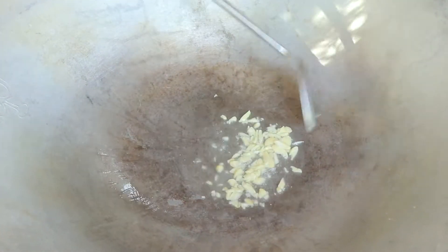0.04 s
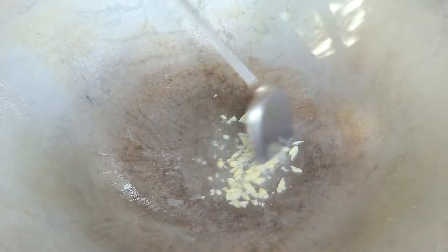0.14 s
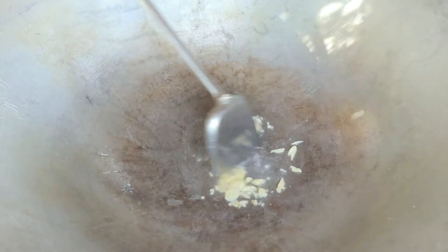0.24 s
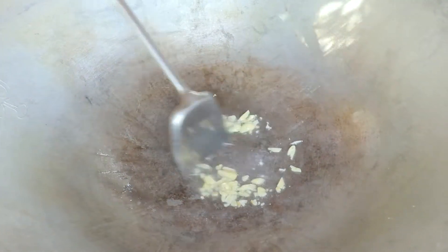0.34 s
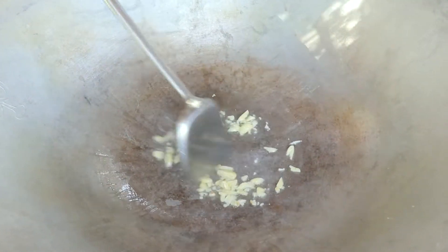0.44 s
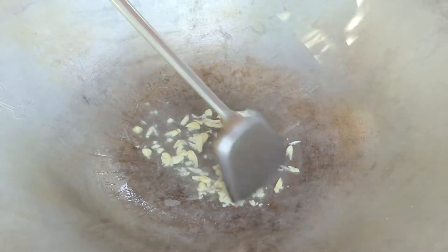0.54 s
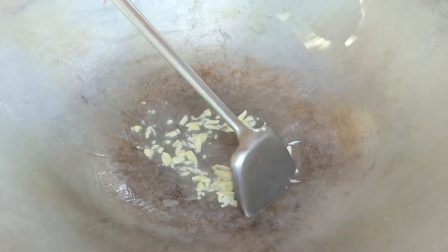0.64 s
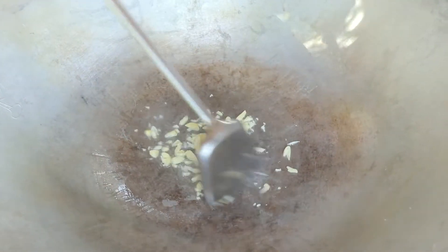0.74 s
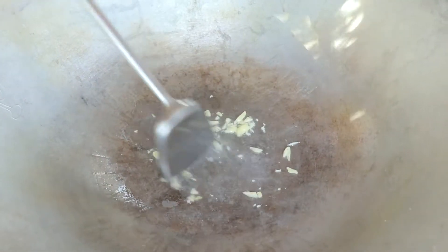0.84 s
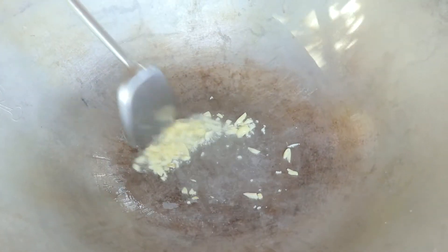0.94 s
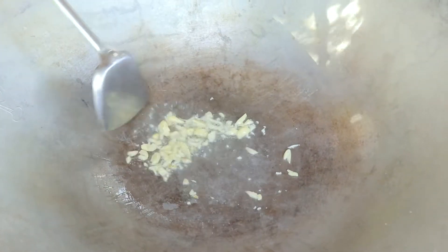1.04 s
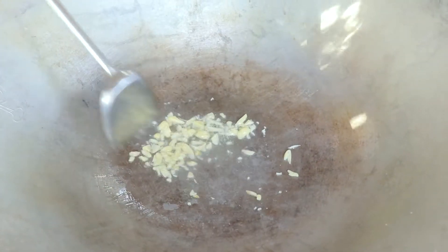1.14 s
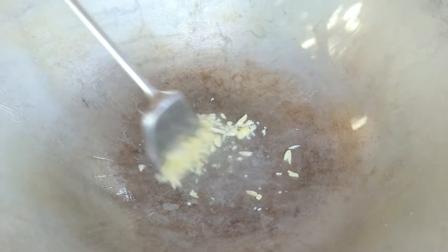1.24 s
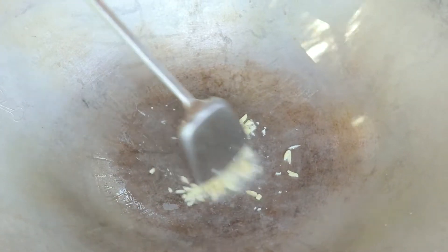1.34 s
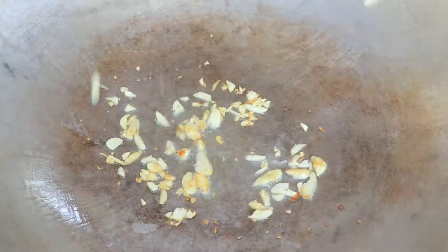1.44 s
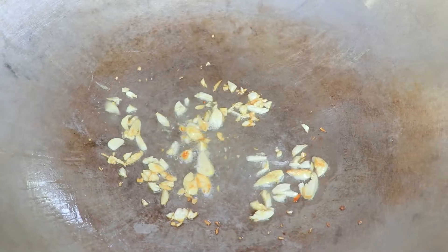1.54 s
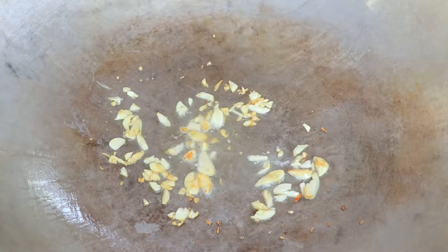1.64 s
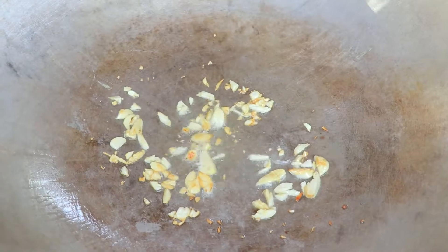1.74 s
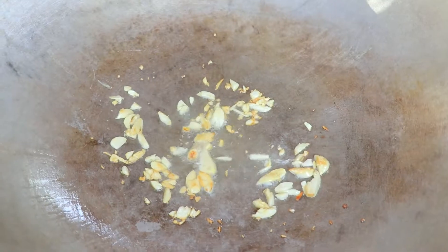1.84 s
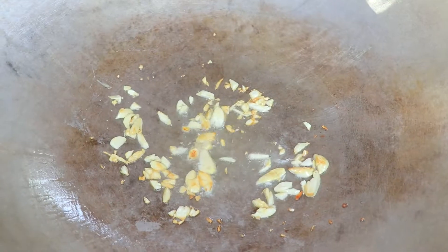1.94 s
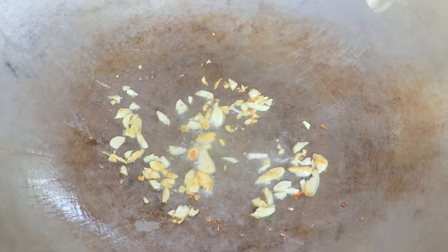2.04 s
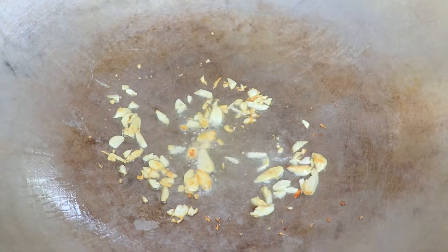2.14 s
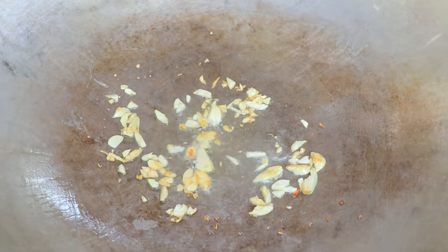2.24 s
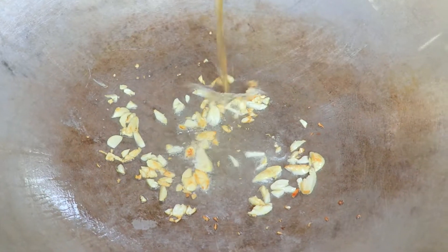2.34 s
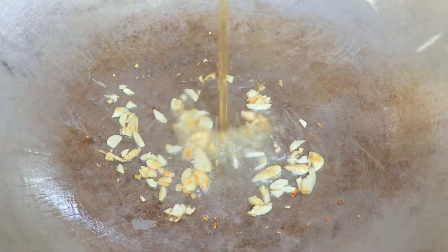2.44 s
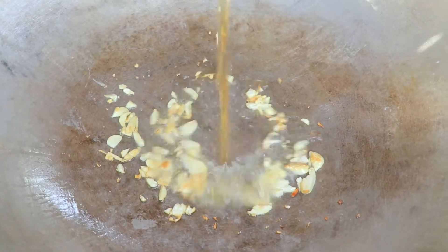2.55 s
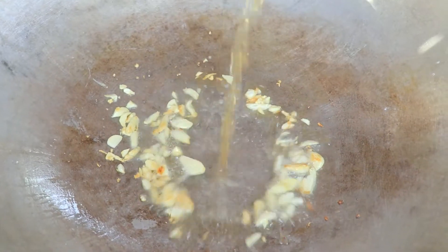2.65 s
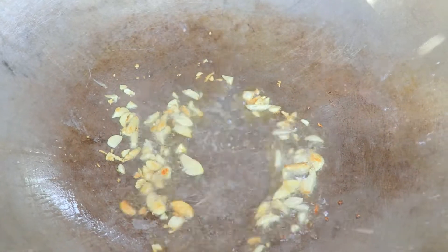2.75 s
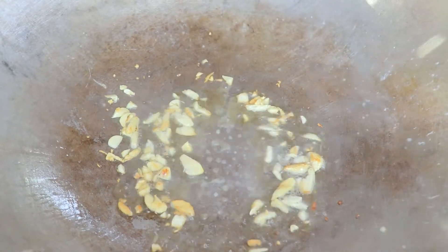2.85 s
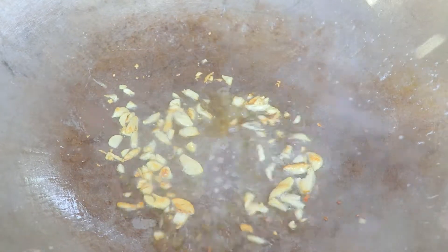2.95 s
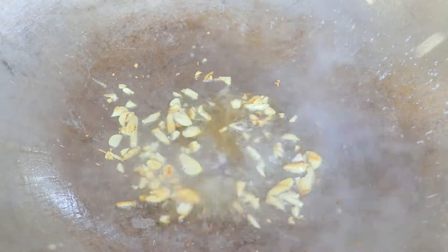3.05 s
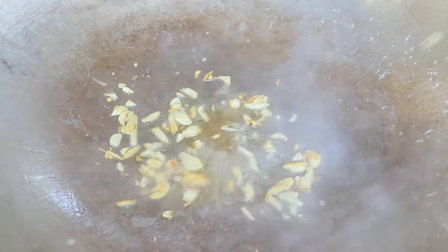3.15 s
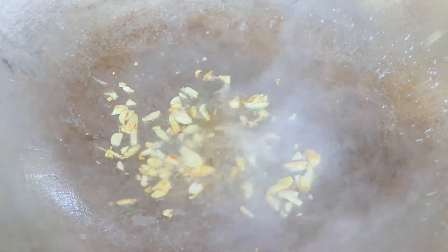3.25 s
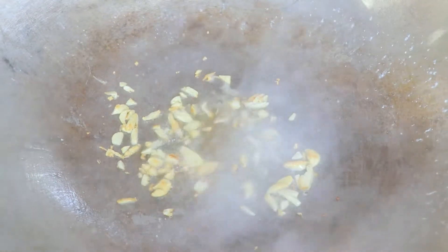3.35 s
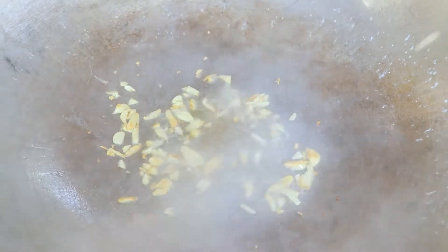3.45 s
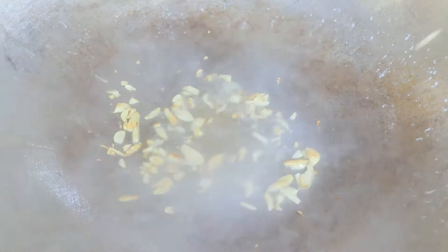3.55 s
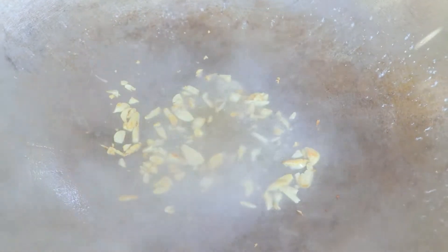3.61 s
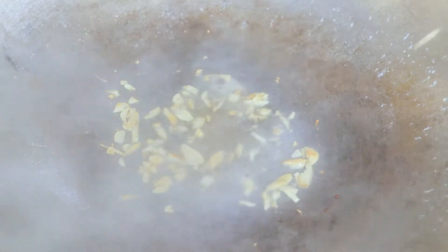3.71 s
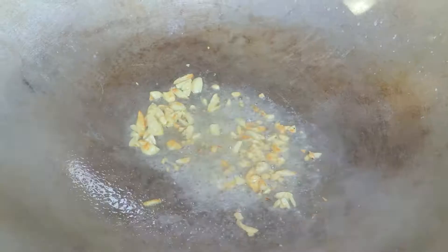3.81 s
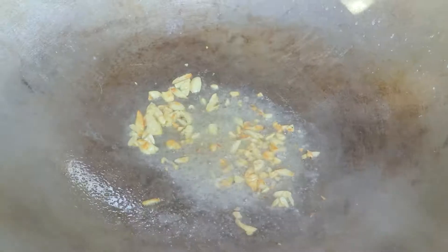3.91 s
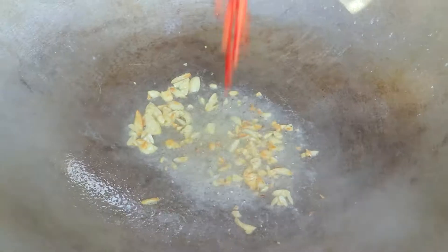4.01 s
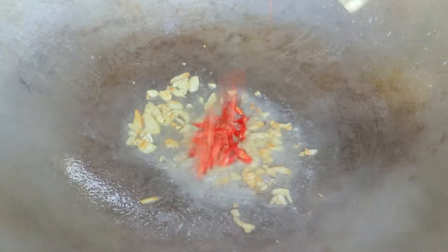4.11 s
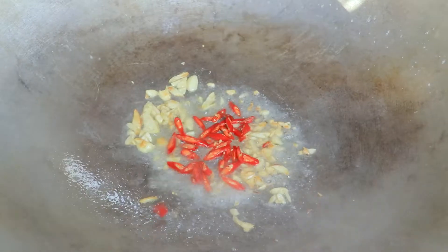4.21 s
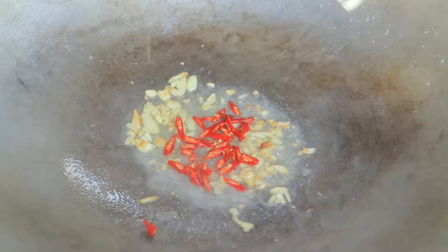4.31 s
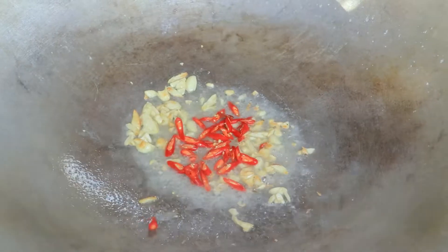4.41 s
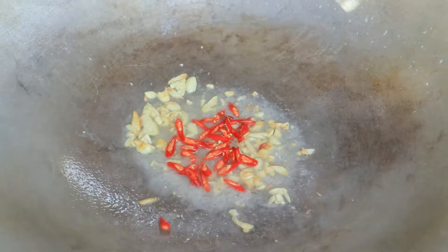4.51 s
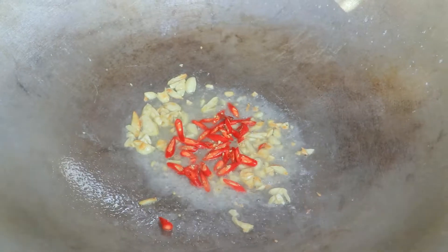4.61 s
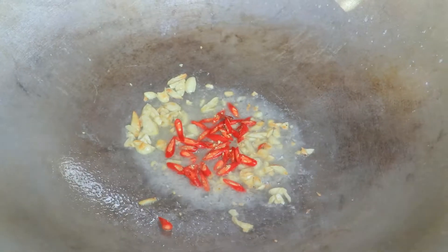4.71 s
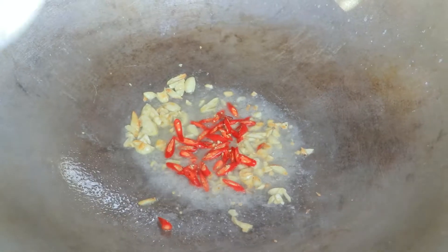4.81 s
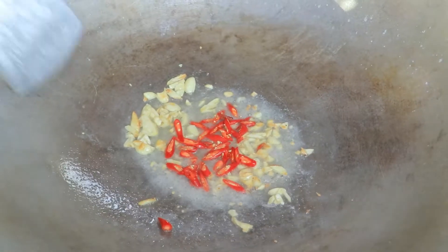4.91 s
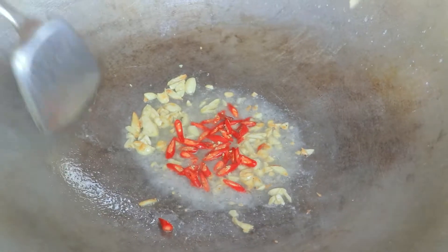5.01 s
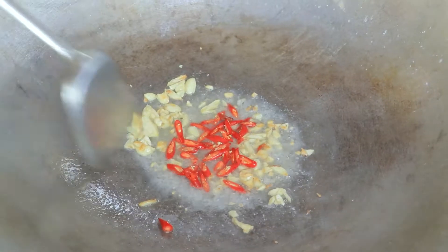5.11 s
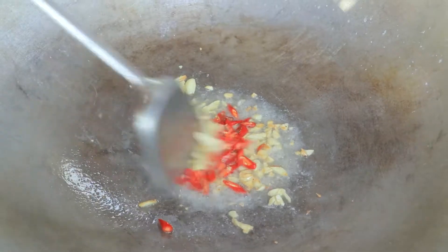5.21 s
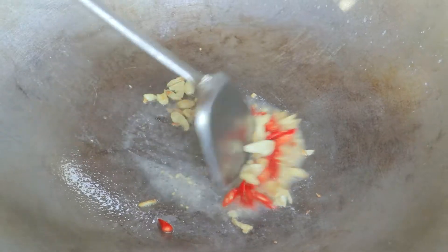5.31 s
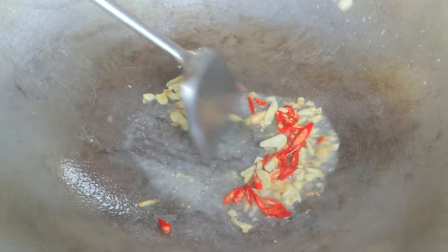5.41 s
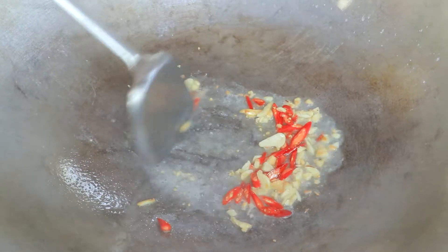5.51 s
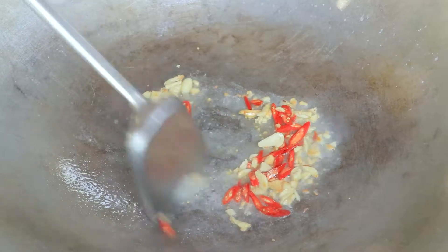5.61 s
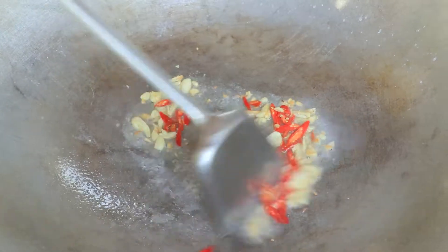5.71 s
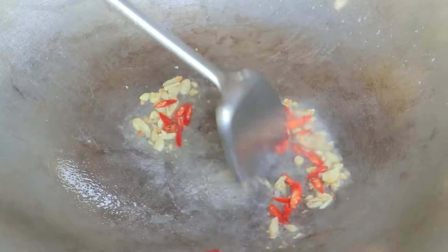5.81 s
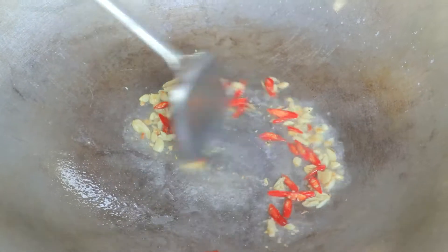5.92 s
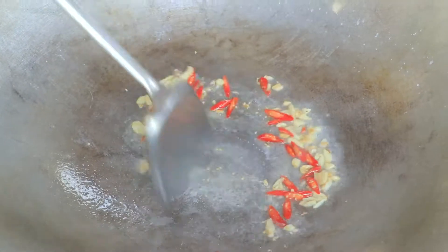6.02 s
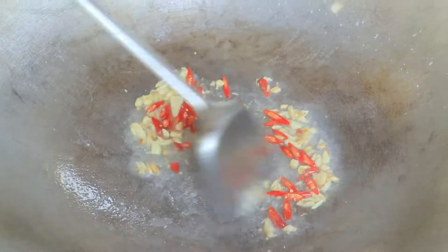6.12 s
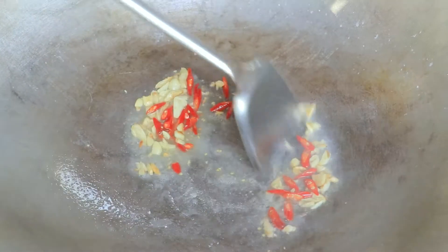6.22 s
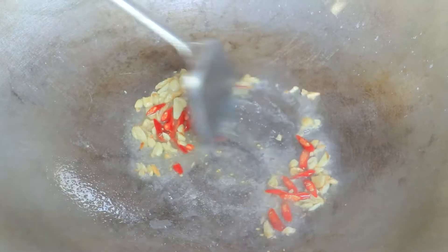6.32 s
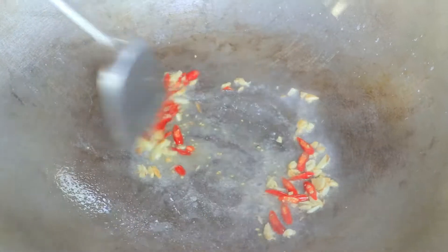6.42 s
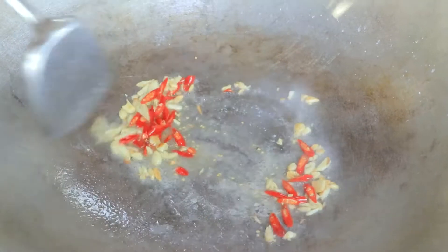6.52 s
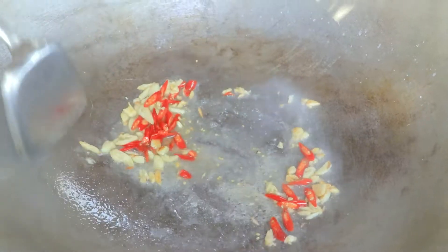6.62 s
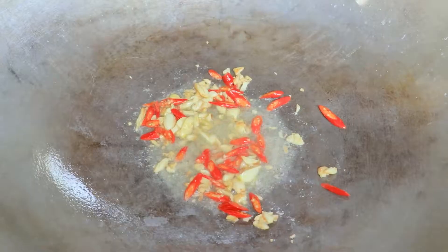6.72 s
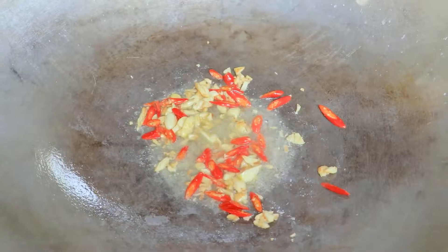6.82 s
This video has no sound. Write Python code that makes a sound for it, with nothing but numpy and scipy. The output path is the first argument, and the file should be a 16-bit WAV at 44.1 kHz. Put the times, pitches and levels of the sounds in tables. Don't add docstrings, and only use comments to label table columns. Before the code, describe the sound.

A close microphone hears a steel wok almost only in the left channel; the right is faint hiss. From 0 to 1.45 s oil sizzles and spits while a metal spatula scrapes in quick, gritty, ringing pushes, with hard clanks near 0.66-0.8 and 1.17 s, some overloading, and a short blade ring. An abrupt cut leaves quiet, thin oil with separate dry ticks and pops. Around 2.4 s poured sauce starts to boil, surging within half a second to a dense, loud, bubbling roar held until 3.86 s. A cut drops it to a steady, softer simmer; chilies land softly at 4.16 s. At 5.12 s a rattling cluster of blows strikes the rim, then from 5.47 to 6.39 s the blade scrapes, snags and squeals, brightest near 6.15 s. Simmer continues to a tiny silence at 6.68 s, then a last rising sizzle. Faint low air and pan hum lie underneath.

```python
import sys
import numpy as np
from scipy import signal
from scipy.fft import rfft, irfft, next_fast_len
from scipy.io import wavfile
from scipy.ndimage import uniform_filter1d, map_coordinates

SR = 44100
rng = np.random.default_rng(int(sys.argv[2]) if len(sys.argv) > 2 else 0)


def int16_out(signal):
    q = np.round(np.clip(np.atleast_2d(signal).T, -1, 1) * 32767)
    wavfile.write(sys.argv[1], SR, q.astype(np.int16))


def level_to_linear(level):
    exponent = np.asarray(level, float) / 20
    return 10 ** exponent


N = 302526
T = np.arange(N) / SR
HZ = np.fft.rfftfreq(next_fast_len(N + SR), 1 / SR)

# (start [s], large bubbles [dB], drift [dB/s], small over large [dB], crackle over hiss [dB])
TAKES = [
    (0, -38, -3.5, -3, 1.5),
    (1.459, -57, -2.5, -5.5, 3),
    (3.862, -40.5, -0.45, 0.4, -18),
    (5.122, -41, 1.5, -1, -12),
    (6.68, -47, 7, 0.5, -11),
]
# (pitch [Hz], width [Hz], level [dB])
PAN = [(128.5, 17, -16.5), (165, 30, -17), (253, 180, -6), (319, 73, -14), (429, 70, -16), (474, 72, -11),
       (621, 28, -11), (786, 70, -18), (1071, 18, -8), (1250, 47, -4), (1365, 150, 1.5), (1600, 115, -0.5),
       (1780, 65, -2), (1930, 17, -8), (2020, 11.6, -6.5), (2130, 90, -2.5), (2340, 91, -1),
       (2550, 72, -2.5), (2784, 21, -4.5), (3100, 73, -6), (3110, 20, -11), (3330, 52, -7.5),
       (4680, 200, -13)]
TAKE = np.searchsorted([row[0] for row in TAKES], T, "right") - 1
BEFORE_CHILIES = T < TAKES[2][0]


def unit(x):
    return x / np.sqrt(np.mean(x ** 2) + 1e-20)


def along(points, hz):
    f, v = np.transpose(points)
    return np.interp(np.log(hz + 1), np.log(f + 1), v)


def wobble(rate, step=1):
    coarse = T[::16]
    knots = rng.standard_normal(int(N * rate / SR) + 4)
    return np.interp(T[::step], coarse, map_coordinates(knots, [coarse * rate]))


def filtered(x, response):
    m = 2 * len(HZ) - 2
    return irfft(rfft(x, m) * response, m)[:N]


def narrow_noise(hz, width):
    return unit(filtered(rng.standard_normal(N), 1 / (1 + (2 * (HZ - hz) / width) ** 2)))


def bursts(s, size, hz, cycles, length=256):
    turn = np.outer(hz, np.arange(length) / SR)
    life = 2 * turn / np.maximum(cycles, .2)[:, None]
    wave = size[:, None] * np.sin(2 * np.pi * turn) * life * np.exp(1 - life)
    at = np.round(s * SR).astype(int)[:, None] + np.arange(length)
    return np.bincount(at.ravel(), wave.ravel(), N + SR)[:N]


def space(x, wet_db):
    # (pitch [Hz], time to fall 60 dB [s])
    echo_time = [(500, 0.072), (3000, 0.079), (12000, 0.069)]
    out = np.pad(x, (0, SR))
    quarter = SR // 4
    for a in range(0, N, quarter):
        piece = x[a:a + quarter]
        if not piece.any():
            continue
        hz, t, z = signal.stft(rng.standard_normal(SR // 5), SR, nperseg=128)
        fade = level_to_linear(-60 * t / along(echo_time, hz)[:, None])
        tail = signal.istft(z * fade, SR, nperseg=128)[1]
        wet = signal.fftconvolve(piece, tail / np.linalg.norm(tail))
        out[a + 40:][:len(wet)] += level_to_linear(wet_db) * wet
    return out[:N]


def boil_share(lead_s=0):
    # (time [s], share of full boil)
    heating = [
        (2.37, 0.033),
        (2.44, 0.21),
        (2.52, 0.62),
        (2.68, 0.83),
        (2.86, 0.96),
        (3.0, 1.034),
        (3.3, 1.04),
        (3.87, 1.067),
    ]
    return np.interp(T + lead_s, *np.transpose(heating))


def simmer():
    start, large, drift, small, crackle = np.array(TAKES)[TAKE].T
    large = large + drift * (T - start)
    middle = large - 3.5 + 0.82 * small
    full_db = 31.5
    small_boil, middle_boil, large_boil = (boil_share(lead_s) * BEFORE_CHILIES for lead_s in (0.049, 0.02, 0))
    drowned_db = -11 * np.minimum(3 * large_boil, 1)
    return (large + small + full_db * small_boil, middle + full_db * middle_boil,
            large + full_db * large_boil, crackle + drowned_db)


def crowd(count, low_hz, spread_db, cycles, wet_db):
    d = rng.random((count, 3))
    size = level_to_linear(-spread_db * np.log(np.maximum(d[:, 1], .04)))
    pitch = low_hz * (14000 / low_hz) ** d[:, 2]
    x = space(bursts(d[:, 0] * N / SR, size, pitch, np.full(count, cycles), length=128), wet_db)
    tilt = np.sqrt(uniform_filter1d(abs(rfft(x, 2 * len(HZ) - 2)) ** 2, size=3000))
    return unit(filtered(x, 1 / np.maximum(tilt, .05 * tilt.max())))


def frying():
    # (low [Hz], high [Hz])
    bubble_ranges = [(6500, 15000), (3800, 6000), (600, 3300)]
    # (pitch [Hz], level [dB per Hz])
    bowl_colour = [(90, -32), (260, -20), (500, -16), (1000, -9), (1800, -6), (2250, -3), (3050, -4),
                   (3550, -7.5), (5100, -2.5), (5900, -7.5), (6600, -9), (9600, -10), (10800, -15),
                   (15700, -15.5)]
    *levels, crackle_db = simmer()
    bubbles = crowd(count=20000, low_hz=518, spread_db=0.5, cycles=2.05, wet_db=-0.5)
    crackle = crowd(count=1500, low_hz=1500, spread_db=3.5, cycles=.8, wet_db=-3) / np.sqrt(2)
    steam = rng.standard_normal(N)
    raw = 0.5 * bubbles + 0.84 * steam + level_to_linear(crackle_db) * crackle
    upper, lower = (1 / (1 + (c / (HZ + 1)) ** 8) for c in (6300, 3600))
    parts = upper, lower * (1 - upper), 1 - lower
    colour = level_to_linear(along(bowl_colour, HZ))
    surge = 0.36 * wobble(2.8) + 0.5 * wobble(14)
    out = 0
    for db, part, (lo, hi) in zip(levels, parts, bubble_ranges):
        own = colour * np.sqrt(part)
        inside = np.sqrt(np.sum(own[(HZ > lo) & (HZ < hi)] ** 2) / len(HZ))
        out = out + level_to_linear(db - 3.0 + surge + 0.16 * wobble(15)) * filtered(raw, own / inside)
    return out


def yard():
    # (pitch [Hz], level [dB per Hz])
    air_colour = [(12, -28.5), (20, -2), (87, -3), (135, -5.5), (205, -9), (399, -25), (499, -19),
                  (900, -44.5), (1170, -33.5), (1980, -120)]
    noise = unit(filtered(rng.standard_normal(N), level_to_linear(along(air_colour, HZ))))
    return level_to_linear(-70.5 + 0.82 * wobble(5.3)) * noise


def humming():
    hum_levels = [-61.5, -80, -78.5, -73, -72]
    return level_to_linear(np.array(hum_levels)[TAKE] + 0.99 * wobble(4.73)) * narrow_noise(127, 12)


def snagging():
    # (time [s], peak [dB], pitch [Hz])
    plucks = [(.014, -22, 2640), (.112, -17.5, 2590), (.159, -24, 3000), (.232, -18.5, 2440),
              (.256, -23, 1670), (.262, -16.5, 2000), (.276, -13.5, 2770), (.392, -21, 2320),
              (.821, -29, 2480), (.831, -25, 1790), (.922, -18.5, 3150), (1.2355, -22, 1620),
              (1.358, -25, 2440), (1.365, -23, 3000), (1.238, -24, 3100), (1.272, -26, 2900),
              (5.474, -20, 2340), (5.499, -13, 2270), (5.562, -26, 2440), (5.674, -19, 2220),
              (5.735, -21, 2140), (5.76, -26, 2130), (5.938, -24, 1376), (5.951, -9, 2340),
              (5.98, -14, 2340), (6.065, -20, 2320), (6.095, -24, 1250), (6.269, -25, 2300),
              (6.332, -20, 2200), (6.373, -22, 1510)]
    s, db, hz = np.transpose(plucks)
    notes = bursts(s, level_to_linear(db - 3.0), hz, 6 + 0 * s, length=800)
    neighbours = bursts(s, level_to_linear(db - 15.5), 1.31 * hz, 6.1 + 0 * s)
    return space(notes + neighbours, wet_db=-4)


def hand():
    # (lands [s], lifts [s], drag [dB], rumble [dB], rumble fade [dB/s])
    contacts = [
        (0.039, 0.351, -34.5, -42, -19),
        (0.373, 0.518, -44, -78, -10),
        (0.797, 0.936, -42, -43, -150),
        (1.11, 1.133, -35, -43, -20),
        (1.188, 1.46, -47.5, -42.5, -140),
        (5.465, 6.386, -39.5, -44.5, -0.5),
    ]
    # (peak [s], scrape [dB], rise [s], fall [s], centre of the ring [Hz])
    pushes = [(.092, -33, 0.046, 0.071, 2620), (.155, -29, .04, 0.11, 2550),
              (0.261, -27.5, 0.031, 0.068, 2340), (.335, -30, 0.028, 0.097, 2410),
              (0.803, -27.5, 0.0084, 0.1, 2340), (1.2, -29.5, 0.02, 0.12, 2270),
              (1.357, -32.5, 0.0066, 0.025, 2746), (5.475, -31.5, .02, 0.076, 2340),
              (5.5, -27, 0.046, 0.096, 2250), (5.68, -28, 0.15, 0.095, 2250),
              (5.76, -27, 0.063, 0.051, 2130), (5.91, -29.5, 0.096, .1, 2340),
              (5.955, -27.5, 0.072, 0.027, 2270), (5.985, -25.5, 0.041, 0.029, 2290),
              (6.01, -31.5, .04, 0.02, 1900), (6.1, -23, 0.063, 0.097, 2280),
              (6.157, -26, 0.089, 0.06, 2100), (6.272, -35, 0.013, .05, 2300),
              (6.335, -22.5, 0.078, 0.06, 2200)]
    push_db, rest_hz, jolt_db = 15.5, 2320, 1.5
    t = T[::32]
    touch = np.array([(t >= a) & (t < b) for a, b, *_ in contacts])
    drag = sum(on * level_to_linear(2 * row[2]) for on, row in zip(touch, contacts)) + 1e-9
    rumble = sum(on * level_to_linear(db + fade * (t - a) * on) for on, (a, _, _, db, fade) in zip(touch, contacts))
    push = []
    for s, db, rise, fall, _ in pushes:
        away = np.maximum((s - t) / rise, (t - s) / fall)
        push.append(level_to_linear(2 * db - 2 * push_db * away))
    strength = drag + sum(push)
    centre = (drag * rest_hz + sum(p * row[4] for p, row in zip(push, pushes))) / strength

    def soft(x):
        return np.interp(T, t, uniform_filter1d(x, size=8))

    return soft(touch.any(0) * np.sqrt(strength)), soft(rumble) * level_to_linear(jolt_db * wobble(30)), soft(centre)


def scraping():
    # (time [s], pitch [Hz], extra [dB])
    sings = [(.07, 3100, 15), (.1, 2683, 26), (.15, 2130, 16), (.155, 3100, 11), (.34, 3100, 9),
             (.202, 1071, 8), (.263, 1600, 9), (.273, 2550, 12), (.335, 1440, 11), (5.53, 626, 10),
             (5.5, 2340, 1), (5.71, 1780, 2), (5.711, 128.5, 12), (6.11, 253, 8), (5.74, 2140, 14),
             (5.92, 624, 14), (5.96, 2340, 8), (6.1, 2340, 7.5), (6.0, 1250, 9), (6.086, 1365, 11),
             (6.104, 3330, 6), (6.143, 2020, 9), (6.085, 1160, 11), (6.148, 1071, 4), (6.322, 626, 13),
             (6.34, 1180, 8)]
    # (pitch [Hz], level [dB per Hz])
    grit_colour = [(300, -17), (900, -25), (1500, -3.5), (2500, 8.5), (3400, 1.5), (5000, 0), (9000, -27),
                   (15000, -61.5)]
    # (pitch [Hz], level [dB per Hz])
    shudder_colour = [(90, -24), (140, -0.5), (300, -3), (420, -9.5), (700, -16), (1200, -60)]
    edge, rumble, centre = hand()
    sound, energy, slow = [0, 0], [0, 0], T[::64]
    catches = rng.standard_normal(N) * level_to_linear(1.3 * wobble(400) + 0.6 * wobble(45))
    on = edge > 0
    for hz, width, db in PAN:
        r = np.exp(-np.pi * .75 * width / SR)
        poles = [1, -2 * r * np.cos(2 * np.pi * hz / SR), r * r]
        mode = signal.lfilter([1, 0, -1], poles, catches[on])
        gain_db = db + 1.2 * wobble(25, step=64)
        for s, sung_hz, extra_db in sings:
            nearness = np.exp(-((slow - s) / 0.04) ** 2 - (22 * np.log(hz / sung_hz)) ** 2)
            gain_db = gain_db + extra_db * nearness
        high = int(hz > 700)
        if high:
            gain_db = gain_db + np.maximum(-16 * np.log2(hz / centre[::64]) ** 2, -6)
        else:
            mode = signal.lfilter([1, 0, -1], poles, mode)
        gain = np.interp(T[on], slow, level_to_linear(gain_db))
        sound[high] = sound[high] + gain * unit(mode)
        energy[high] = energy[high] + gain ** 2
    low, ring = (x / np.sqrt(p) for x, p in zip(sound, energy))
    grit = unit(filtered(catches, level_to_linear(along(grit_colour, HZ))))[on]
    shudder = unit(filtered(catches, level_to_linear(along(shudder_colour, HZ))))[on]
    out = np.zeros(N)
    out[on] = edge[on] * (.9 * ring + .45 * grit) + rumble[on] * (0.57 * low + 0.38 * shudder)
    return out


def squealing():
    # (middle [s], half length [s], level [dB], pitch [Hz])
    squeals = [(0.2, 0.02, -38, 1071), (5.486, 0.025, -40.5, 670), (5.703, 0.023, -30, 1780),
               (5.747, 0.018, -33.5, 1780), (6.151, 0.033, -21.5, 2020), (6.154, 0.027, -32.5, 1071),
               (6.203, 0.035, -39, 1365), (6.321, 0.04, -40, 645), (0.053, 0.017, -46, 200),
               (.115, 0.019, -43, 140), (.165, 0.041, -42.5, 275), (0.332, 0.016, -48, 440),
               (5.62, 0.026, -47, 320), (5.66, 0.026, -45, 245), (5.709, 0.038, -38.5, 135),
               (5.772, 0.02, -39.5, 255), (5.845, .025, -42.5, 230), (5.985, 0.015, -44, 680),
               (6.076, 0.018, -38.5, 230), (6.127, 0.019, -41.5, 240), (6.22, .03, -46.5, 300),
               (6.28, .018, -38.5, 270), (6.335, 0.028, -44.5, 280)]
    drift = np.cumsum(0.00393 * wobble(50)) / SR
    shake = level_to_linear(3.0 * wobble(70))
    out = np.zeros(N)
    for s, half, db, hz in squeals:
        on = abs(T - s) < 2 * half
        swell = np.exp(-((T[on] - s) / half) ** 4)
        out[on] += level_to_linear(db) * swell * np.sin(2 * np.pi * hz * (T + drift)[on])
    return shake * out


def spitting():
    # (time [s], peak [dB], pitch [Hz])
    spits = [(.1595, -19, 2800), (.211, -23, 1800), (0.2782, -19, 2610), (.379, -21, 5000),
             (.519, -27, 3000), (0.31, -24, 4710), (0.35, -20.5, 3260), (0.394, -25, 2400),
             (0.4554, -21, 4190), (0.488, -22, 2820), (0.561, -31, 2090), (0.5951, -19, 7000),
             (0.6267, -28.5, 4720), (0.755, -21, 3000), (0.868, -21.5, 4433), (0.884, -18.5, 4940),
             (0.936, -22.5, 2340), (0.965, -24, 2440), (1.0741, -15.5, 4030), (1.153, -19.5, 3440),
             (1.2348, -12.5, 4200), (1.2926, -23, 2200), (1.352, -30.5, 3060), (1.447, -37, 2230),
             (5.303, -32, 4840)]
    # (time [s], peak [dB])
    common_pitch_bursts = [(1.462, -28), (1.486, -40), (1.508, -30.5), (1.523, -31), (1.5974, -42),
                           (1.6232, -31.5), (1.663, -26.5), (1.7983, -47), (1.8464, -28), (1.865, -24),
                           (1.9067, -36), (2.041, -33), (2.0723, -24.5), (2.1044, -34), (2.1968, -25.5),
                           (2.26, -22), (2.3002, -27.5), (2.377, -32)]
    # (time [s], peak [dB], pitch [Hz])
    other_bursts = [(1.524, -53, 506), (1.5455, -30, 7300), (1.5714, -28.5, 9200), (1.5985, -36, 6600),
                    (1.613, -37.5, 6800), (1.654, -40, 6200), (1.4865, -36, 6100), (1.7195, -34, 5000),
                    (1.7983, -39, 6000), (1.9075, -38, 7400), (2.178, -39, 7400), (1.6786, -33, 8200),
                    (1.7192, -32, 3150), (1.741, -22, 3100), (1.8735, -28, 2230), (1.881, -25, 4230),
                    (1.9429, -17, 2530), (1.95, -27, 2550), (1.951, -22.5, 4500), (1.963, -31, 2200),
                    (2.0782, -41, 7060), (2.1138, -21.5, 3970), (2.1608, -21, 1640), (2.226, -27, 3840),
                    (2.2258, -31, 2660), (2.352, -33, 4180), (2.3655, -26.5, 2920), (2.4099, -24, 3800),
                    (2.41, -26.5, 3000), (2.4255, -33.5, 2320), (2.463, -31.5, 8490), (2.47, -36, 2990),
                    (2.503, -25, 4300), (2.535, -40, 611)]
    ticks = [(s, db, 5150 * (1 + 0.04 * rng.standard_normal())) for s, db in common_pitch_bursts]
    s, db, hz = np.transpose(ticks + other_bursts)
    cycles = np.where(hz > 3500, 3.1, 2.1)
    lone = bursts(s, level_to_linear(db - 3.5), hz, cycles, length=500)
    lone = lone + bursts(s, level_to_linear(db - 12.5), 1.32 * hz, 0.63 * cycles)
    lone = lone + bursts(s, level_to_linear(db - 14.0), 0.8 * hz, 1.44 + 0 * s)
    s, db, hz = np.transpose(spits)
    loud_spits = bursts(s, level_to_linear(db + 9.0), hz, 0.7 + 0 * s)
    loud_spits = signal.lfilter(*signal.butter(2, 10500, fs=SR), loud_spits)
    return level_to_linear(-2.0) * space(lone, wet_db=5.0) + space(loud_spits, wet_db=-7.5) / np.sqrt(2)


def knocking():
    # (time [s], peak [dB], thud [dB], rattle time to fall 60 dB [s], ring [dB])
    knocks = [(0.6594, 3, -22.5, 0.055, -36), (0.6772, -18, -22, 0.032, -7),
              (0.6862, -15.5, -9.5, 0.044, -4.5), (0.7981, -17, -19, 0.017, -26),
              (1.165, -10, -10.5, 0.034, -44), (1.1672, -3, -23, 0.046, -34), (1.2022, -16, -30, 0.09, -42),
              (5.1215, -5, -24, 0.07, -39), (5.1253, -8.5, -26, 0.04, -39), (5.1365, -19, -30, 0.034, -30),
              (5.1405, -3, -36, 0.039, -18), (5.1447, -6, -29.5, 0.026, -25),
              (5.1564, -16.5, -25, 0.05, -20), (5.465, -22, -20, 0.023, -17)]
    # (pitch [Hz], level [dB], time to fall 60 dB [s])
    free_blade = [(1071, 1, 0.29), (1285, -13, 0.23), (1880, -12, .2), (2046, -13, .16), (2272, -16, .2),
                  (2880, -16, .3), (3300, -13, .22), (3424, -20, 0.26), (3854, -18, .2)]
    # (pitch [Hz], level [dB], time to fall 60 dB [s])
    held_blade = [(1120, -24, .12), (1250, -15, 0.38), (1350, -14, 0.39), (1453, -12.5, 0.29),
                  (1640, -15, 0.14), (1900, -13, 0.21), (2090, -3, 0.15), (2386, -8, 0.17),
                  (2550, -5, 0.12), (3300, -13, 0.22), (3435, -8, 0.17), (4506, -10, .1)]
    # (pitch [Hz], level [dB], time to fall 60 dB [s])
    clangs = [
        [(483, -25, 0.046), (786, -4.5, 0.033), (1750, -14, .05), (1896, -2.5, 0.065), (2060, -8, .06),
         (2580, -8.5, 0.06), (2754, -5, 0.06), (3090, -10, 0.063), (3480, -21, 0.041), (4940, -3, 0.022),
         (5440, -22, 0.029), (6600, -11, 0.022)],
        [(268, -11, 0.021), (603, -12, 0.036), (1045, -19, .08), (1900, -4, 0.07), (2340, -5, .07),
         (2418, 1.5, 0.072), (2846, -3.5, 0.06), (3280, -8, .04), (4263, -7, 0.035), (4730, -12, 0.064),
         (5450, -21, 0.051)],
        [(121, -9.5, 0.1), (260, -6, 0.02), (1090, -12, .06), (1600, -4.5, 0.028), (2055, -3, 0.049),
         (2420, -2, 0.038), (2510, -9, 0.06), (3150, -11, 0.037), (3760, -3, 0.051), (4360, -2, 0.046),
         (4740, -7, 0.051), (5410, -4, 0.056)],
        [(1410, -15, .04), (1930, -6, .04), (2085, 1, 0.048), (2156, -4, .04), (2560, -2, 0.04),
         (3434, -10, 0.038), (4070, -4, .045), (4730, -5, .035), (5230, -11, .03)],
    ]
    # (pitch [Hz], level [dB per Hz])
    rattle_colour = [(180, -36), (300, -26), (735, -35), (1040, -13), (1480, -36), (1990, -12), (2510, 0),
                     (3010, -5), (4410, -12.5), (5650, -7.5), (6040, -17.5), (9610, -24), (15800, -40)]
    # (pitch [Hz], level [dB per Hz])
    thump_colour = [(90, -2.5), (250, 6), (420, -26), (750, -14), (1100, 4), (3000, -57)]
    damped_s = 0.773
    out, rings, t = np.zeros(N + SR), np.zeros(N + SR), np.arange(SR // 3) / SR
    rattle_gain = level_to_linear(along(rattle_colour[:-2], HZ)) / (1 + (HZ / 10500) ** 6)
    rattle = unit(filtered(rng.standard_normal(N), rattle_gain))
    thump = unit(filtered(rng.standard_normal(N), level_to_linear(along(thump_colour, HZ))))
    flutter, rough = wobble(53), wobble(170)
    for k, (s, db, thud_db, t60, ring_db) in enumerate(knocks):
        start = round(s * SR)
        fall = level_to_linear(-60 * t / t60) * (1 - np.exp(-t / 0.00063))

        low, high = 0, 0
        for hz, width, g in PAN:
            mode = level_to_linear(g + rng.normal(0, 1.9) - 16.0 * width * t) * np.sin(2 * np.pi * hz * t)
            if hz < 560:
                low = low + mode
            else:
                high = high + mode

        blade = 0
        for hz, g, d in free_blade if s < 3 else held_blade:
            shaken_db = 5 * (hz > 1100) * rough[int(hz) * 20:][:len(t)]
            blade = blade + level_to_linear(g - 60 * t / d + shaken_db) * np.sin(2 * np.pi * hz * (s + t))
        freed = 1 - np.exp(-t / 0.0094)
        blade = blade * freed * level_to_linear(2.5 * flutter[start:][:len(t)])
        if s < damped_s:
            blade = blade * level_to_linear(-450 * np.maximum(s + t - damped_s, 0))

        clang = 0
        for hz, g, d in clangs[(s > 1) + (s > 3) + (s > 5.13)]:
            rough_db = 2.5 * rough[rng.integers(N // 2):][:len(t)]
            clang = clang + level_to_linear(g + rough_db - 60 * t / (d * 0.75)) * np.sin(2 * np.pi * hz * t)

        hit = level_to_linear(-5.5) * (1 - np.exp(-t / 0.0012)) * clang
        hit = hit + level_to_linear(-9.5) * fall * rattle[k * 20000:][:len(t)] + level_to_linear(-24.0) * high
        thud = level_to_linear(1.5) * low + level_to_linear(8 - 60 * t / 0.016) * thump[k * 20000:][:len(t)]
        out[start:][:len(t)] += level_to_linear(db) * (hit + level_to_linear(thud_db) * thud)
        rings[start:][:len(t)] += level_to_linear(db + ring_db) * blade
    return space(out[:N], wet_db=-10.0) + rings[:N]


def sauce():
    ridge_hz, ridge_width_hz, ridge_db = 2700, 1260, -34.5
    response = 1 / (1 + (2 * (HZ - ridge_hz) / ridge_width_hz) ** 4)
    ridge = unit(filtered(rng.standard_normal(N), response))
    return BEFORE_CHILIES * level_to_linear(ridge_db + 38 * (boil_share() - 1) + 1.2 * wobble(40)) * ridge


def swelling():
    # (time [s], length [s], level [dB], pitch [Hz])
    swells = [
        (2.735, 0.07, -59.5, 138),
        (4.157, 0.035, -44, 1180),
        (4.19, 0.053, -61, 170),
        (4.685, 0.32, -68, 69),
        (5.303, 0.069, -59, 195),
    ]
    out = 0
    for s, length, db, hz in swells:
        out = out + level_to_linear(db) * np.exp(-((T - s) / length) ** 2) * narrow_noise(hz, 0.48 * hz)
    return out


def scene():
    # (start [s], end [s])
    gap = (6.672, 6.6975)
    running = (T < gap[0]) | (T > gap[1])
    near = frying() + snagging() + scraping() + squealing() + spitting() + knocking() + sauce()
    near = signal.sosfilt(signal.butter(4, 115, "high", fs=SR, output="sos"), near)
    left = running * 2 * (near + yard() + humming() + swelling())
    right = level_to_linear(-76) * rng.standard_normal(N) + level_to_linear(-67) * np.roll(left, shift=-2)
    return np.array([left, right])


def roll_off(x):
    return signal.sosfilt(signal.butter(12, 16710, fs=SR, output="sos"), x)


def record(dry):
    overload = np.clip(dry, -1.02, 1.02) - dry
    clipped = dry + signal.sosfilt(signal.butter(2, 110, "high", fs=SR, output="sos"), overload)
    mix = np.array([filtered(x, HZ < 15750) for x in clipped])
    return roll_off(mix)


dry = scene()
out = record(dry)
int16_out(out)
```